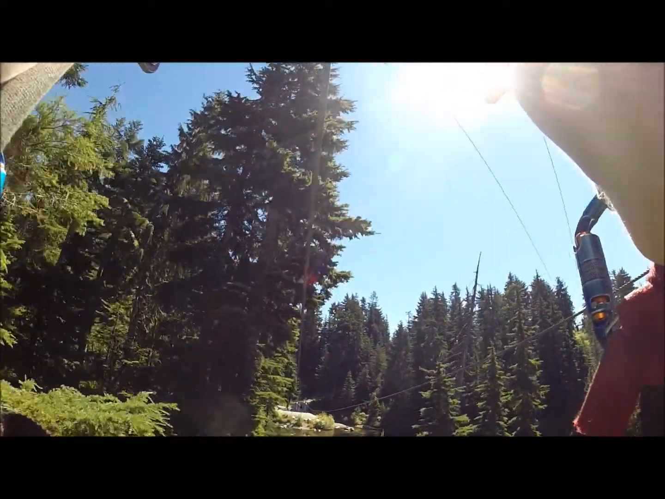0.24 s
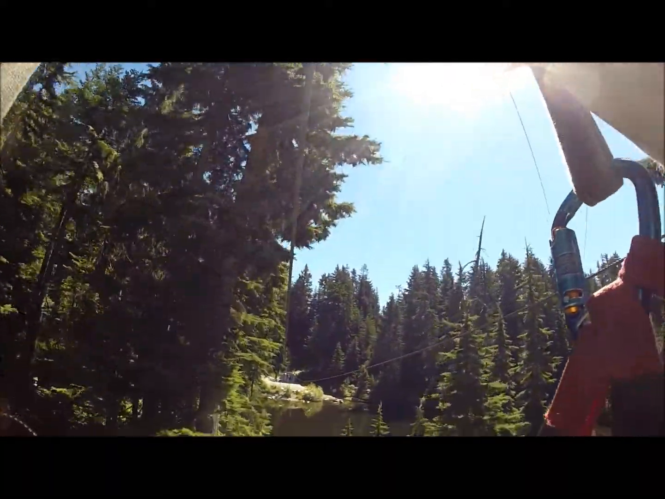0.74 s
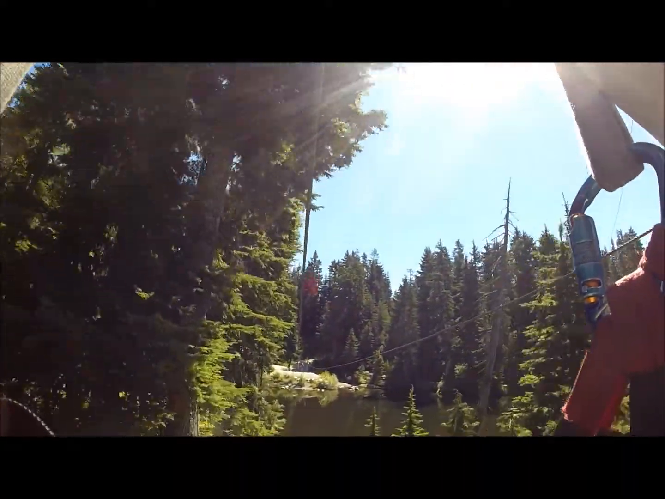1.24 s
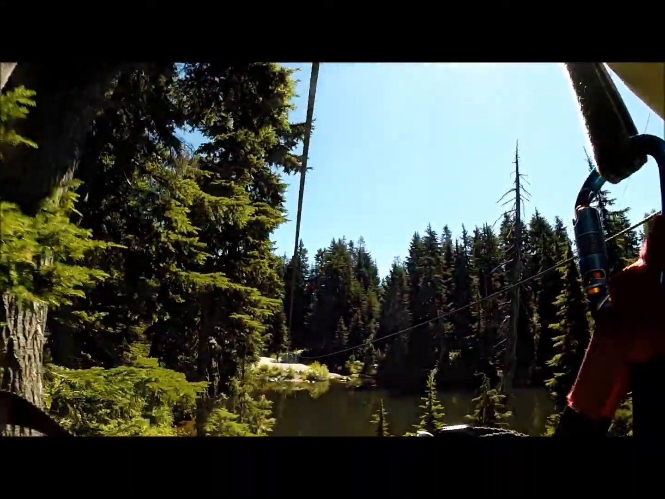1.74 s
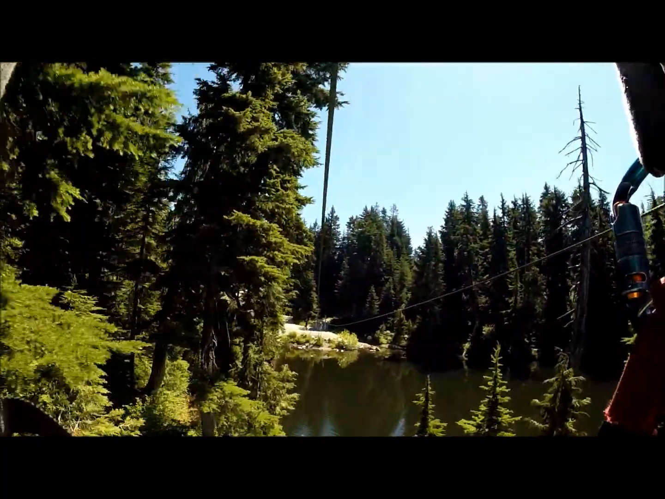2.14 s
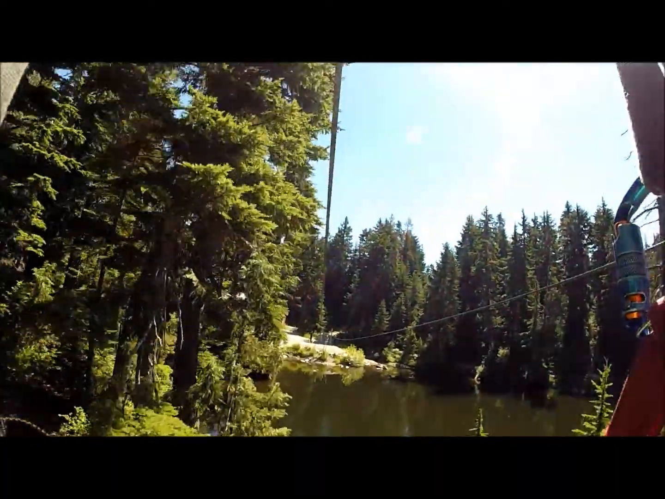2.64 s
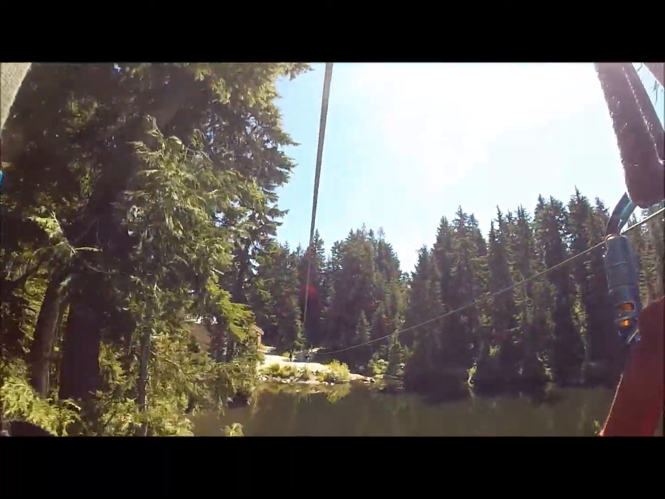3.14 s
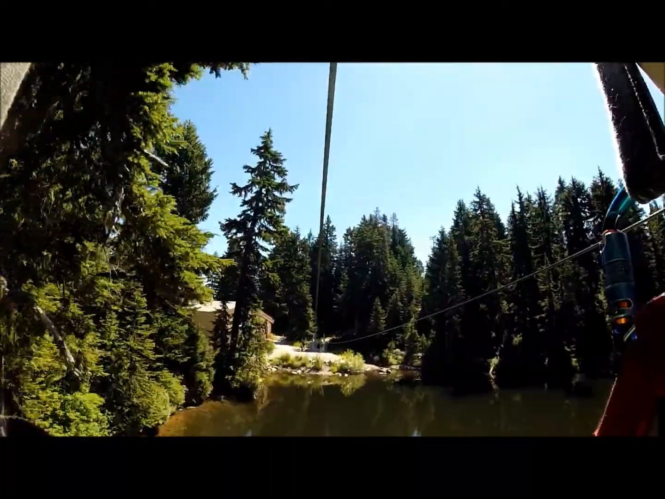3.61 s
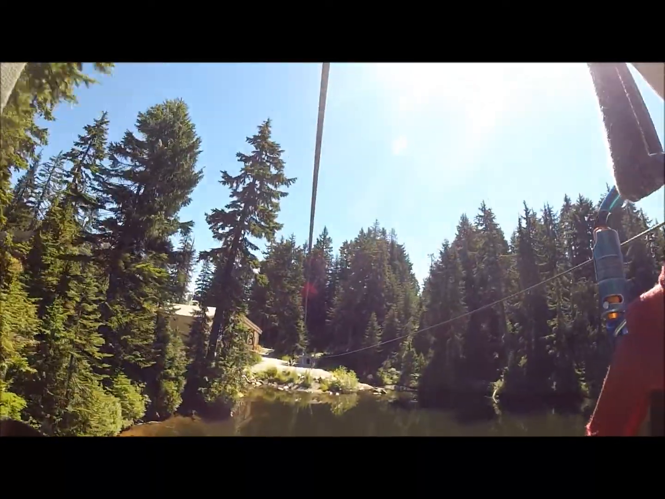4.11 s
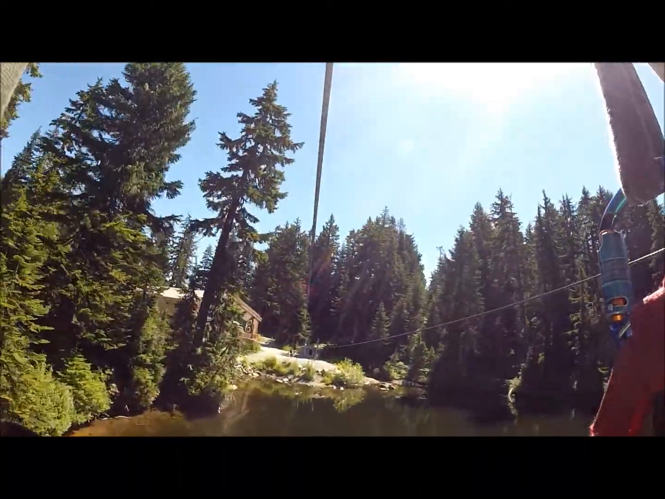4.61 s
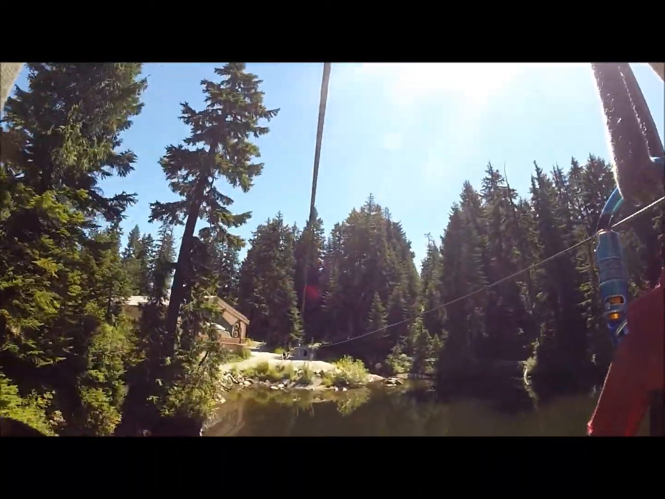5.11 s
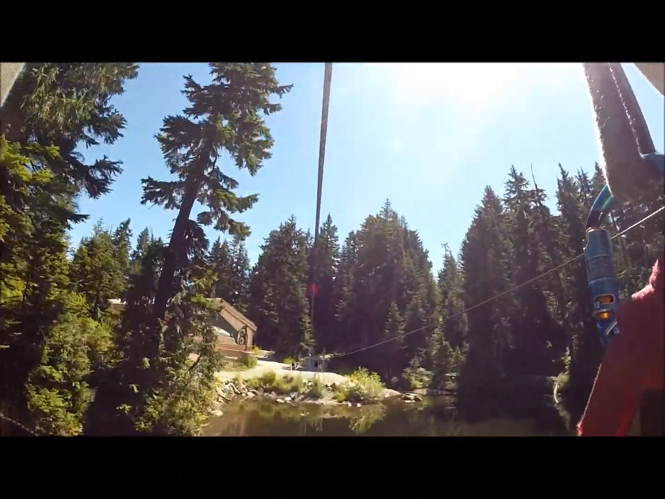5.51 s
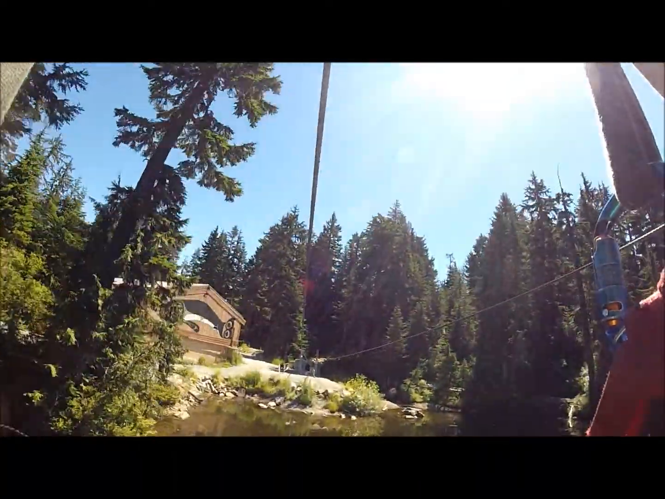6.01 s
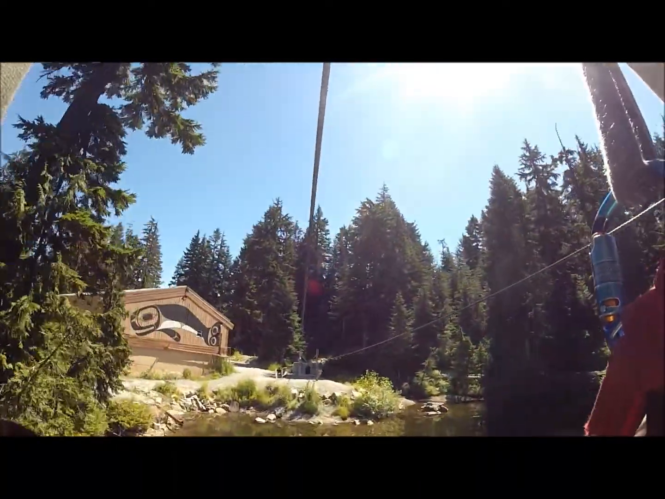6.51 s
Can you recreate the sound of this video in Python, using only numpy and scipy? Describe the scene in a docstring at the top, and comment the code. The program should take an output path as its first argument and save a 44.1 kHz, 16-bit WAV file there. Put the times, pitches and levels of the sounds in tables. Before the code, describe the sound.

A zipline trolley rolls along a steel cable, heard close from the rider's position, with low wind buffeting the microphone throughout and a very faint hush of trees behind. The wheel's whine starts as a low, juddering hum and climbs steadily in pitch, quickly at first and then more slowly. A thin cable zing appears around 0.7 seconds. From 0.8 seconds straps rub and gear ticks; a quick rattle of knocks at 1.5 seconds leads to one sharp, loud clack at about 1.6 seconds. Everything dips briefly, then recovers. The whine is strongest from 2.6 to 4.6 seconds, joined by a rough drone, a grainy rolling rush, hiss and light metallic sizzle. A faint hollow ring comes and goes between 3 and 5.5 seconds. The whine softens around 5 seconds, then swells again near 6 seconds with a brighter rasp and slightly stronger wind.

```python
"""A zipline trolley gathers speed on a stranded steel cable, heard from a camera carried by the rider.
Its wheel bumps over the strands in a rising whine; the rolling rush, the bearing's hiss and the
flange's sizzle grow with speed, while wind buffets the microphone over a faint hush of trees.
Straps rub, the gear knocks, and one sharp clack makes the camera's limiter duck and slowly recover."""
import sys
import numpy as np
from scipy import signal
from scipy.fft import rfft, irfft, next_fast_len
from scipy.io import wavfile
from scipy.ndimage import uniform_filter1d, minimum_filter1d, map_coordinates

SR = 44100
rng = np.random.default_rng(int(sys.argv[2]) if len(sys.argv) > 2 else 0)


def file_out(sig):
    """Save sig as 16-bit WAV at sys.argv[1]."""
    # one column per channel
    cols = np.atleast_2d(sig).T
    # limit, then scale
    lim = np.clip(cols, -1, 1)
    pcm = np.round(lim * 32767).astype(np.int16)
    wavfile.write(sys.argv[1], SR, pcm)


N = 297756

STRANDS_PER_TURN = 23
# rougher and smoother stretches of the ride: peak t/s, rise/s, fall/s, change of the drone/dB
ROUGH_SPELLS = [(1.75, 0.37, 0.14, -14), (2.62, 0.15, 0.23, 7.5), (4.27, 0.23, 0.43, 7),
                (6.25, 0.49, 0.35, 1.5)]


def amp(db):
    """Decibels to gain."""
    return 10 ** (np.asarray(db) / 20)


def unit(x):
    """Scale to rms 1."""
    return x / np.sqrt(np.mean(np.abs(x) ** 2) + 1e-20)


def along(points, hz):
    """Read a curve of f/Hz, value on a log axis."""
    f, v = np.transpose(points)
    return np.interp(np.log(hz + 1), np.log(f + 1), v)


def envelope(points):
    """Straight lines through t/s, value; one value per sample."""
    times, values = np.transpose(points)
    return np.interp(np.arange(N) / SR, times, values)


def swell(peak_s, rise_s, fall_s):
    """A smooth hump of height 1."""
    t = np.arange(N) / SR - peak_s
    return np.exp(-(t / np.where(t < 0, rise_s, fall_s)) ** 2)


def lifts(events):
    """The dB that a table of swells adds over time."""
    return sum(db * swell(s, rise, fall) for s, rise, fall, db in events)


def with_speed(pitch_hz, full_db, db_per_octave, full_hz):
    """A level in dB that grows with speed and settles once the pitch reaches full_hz."""
    return full_db + db_per_octave * np.minimum(np.log2(pitch_hz / full_hz), 0)


def wobble(rate, step=12):
    """A smooth random curve, rate knots a second."""
    knots = rng.standard_normal(4096)
    grid = np.arange(0, N + step, step)
    return np.interp(np.arange(N), grid, map_coordinates(knots, [grid * rate / SR], mode="wrap"))


def filtered(x, response):
    """Filter x with a gain given as a function of frequency."""
    size = next_fast_len(N + SR // 2)
    return irfft(rfft(x, size) * response(np.fft.rfftfreq(size, 1 / SR)), size)[:N]


def equalised(x, colour):
    """Shape x with an EQ curve of f/Hz, gain/dB."""
    return filtered(x, lambda hz: amp(along(colour, hz)))


def impulse_response(colour, size=1024):
    """The minimum-phase impulse response of an EQ curve."""
    cepstrum = irfft(np.log(amp(along(colour, np.fft.rfftfreq(size, 1 / SR)))))
    cepstrum[1:size // 2] *= 2
    cepstrum[size // 2 + 1:] = 0
    return irfft(np.exp(rfft(cepstrum)))


def rig_noise(colour):
    """Coloured noise of rms 1, shaped by the resonances of the rig."""
    # resonances of the hanging rig and the camera case: f/Hz, width/Hz, lift/dB
    resonances = [(31, 8, 4), (54, 12, 5), (108, 20, 3), (166, 16, -4), (192, 16, 6), (1310, 90, 4),
                  (1465, 140, 7), (1870, 70, 5), (2090, 200, 4), (2700, 120, 3), (3100, 150, -2),
                  (3740, 260, 5), (4230, 120, 3), (4700, 150, 2), (5100, 300, -1), (5530, 240, 6.5),
                  (5880, 240, 7), (6230, 200, -3), (7200, 220, 4), (7530, 320, 7), (8490, 200, 5),
                  (9480, 400, 4), (12120, 300, 8), (13400, 550, 5)]

    def response(hz):
        lift_db = sum(db / (1 + 2 * ((hz - f) / width) ** 2) ** 2 for f, width, db in resonances)
        return amp(along(colour, hz) + lift_db)

    return unit(filtered(rng.standard_normal(N), response))


def fuzzy_tones(phase, tones):
    """Narrow bands of noise that ride on multiples of a phase."""
    return sum(amp(db) * unit(wobble(width) * np.cos(k * phase) + wobble(width) * np.sin(k * phase))
               for k, width, db in tones)


def whine(pitch_hz, phase, flutter_db=1.06, jitter_rad=0.53, judder_flutter_db=2.0, smear_db=-15):
    """Each strand bumps the wheel; the bumps merge into a tone with a rough drone around it."""
    # the whine swells and fades: t/s, level/dB
    levels = [(0, -19.5), (.73, -26), (.88, -44), (1.05, -26.5), (1.27, -16.5), (1.44, -27), (1.95, -31),
              (2.2, -25), (2.36, -29), (2.61, -16), (2.95, -17.5), (3.25, -14.5), (3.72, -12.5),
              (4.03, -18), (4.55, -16.5), (5.03, -36.5), (5.95, -33), (6.13, -23), (6.75, -31)]
    # brief dropouts: t/s, way in/s, way out/s, change/dB
    dips = [(.11, 0.028, 0.035, -21), (.225, 0.026, 0.026, -14), (.43, 0.037, 0.052, -17),
            (1.4, .02, 0.028, -16), (2.74, 0.068, 0.035, -9.5), (3.34, 0.033, 0.073, -5.5)]
    # the slow wheel judders just after the launch: peak t/s, rise/s, fall/s
    judder_span = (0.36, 0.34, 0.52)
    # side tones of the drone: multiple of the pitch, width/Hz, relative level/dB
    drone_tones = [(.77, 20, -4.5), (0.859, 14, -6.5), (0.901, 9, 0), (.97, 7, -15.5), (1.092, 16, -10),
                   (1.001, 97, -3)]
    # rough side tones of the judder: multiple of the pitch, width/Hz, level/dB
    judder_tones = [(0.919, 21.43, -32), (1.56, 34.5, -42.5), (2.43, 35.7, -49.5)]
    level_db = envelope(levels) + lifts(dips)
    judder = swell(*judder_span)
    shaky_phase = phase + jitter_rad * wobble(25)
    tremble_db = flutter_db * wobble(30) + judder_flutter_db * judder * wobble(65)
    tone = amp(level_db + tremble_db) * np.sin(shaky_phase)
    drone_db = with_speed(pitch_hz, full_db=-25.0, db_per_octave=22, full_hz=326) + lifts(ROUGH_SPELLS)
    drone_gain = np.hypot(amp(drone_db), amp(level_db + smear_db))
    drone = drone_gain * unit(fuzzy_tones(shaky_phase, drone_tones))
    harmonics = np.sqrt(2) * (tone + overtones(pitch_hz, phase, judder))
    return harmonics + drone + judder * fuzzy_tones(phase, judder_tones)


def overtones(pitch_hz, phase, judder, judder_db=7, flutter_db=2.2, jitter_rad=0.33, db_per_octave=-7):
    """The whine's overtones weaken as they climb, and flare at resonances and while the wheel judders."""
    # overtones: multiple of the pitch, base level at 500 Hz/dB
    partials = [(2, -54.5), (3, -57.5)]
    # rig resonances that each sweeps through: multiple of the pitch, f/Hz, half width/Hz, lift/dB
    resonances = [(2, 345, 40, 17), (2, 562, 36, 16), (3, 458, 22, 5), (3, 585, 18, 10), (3, 845, 60, 11),
                  (3, 1012, 19, 19)]
    out = np.zeros(N)
    for k, base_db in partials:
        hz = k * pitch_hz
        flare_db = sum(db * np.exp(-((hz - f) / width) ** 2)
                       for multiple, f, width, db in resonances if multiple == k)
        tilt_db = db_per_octave * np.log2(hz / 500)
        gain = amp(base_db + tilt_db + flare_db + judder_db * judder + flutter_db * wobble(30))
        out += gain * np.sin(k * (phase + jitter_rad * wobble(25)))
    return out


def rolling(pitch_hz, phase, bearing_db=-3.0):
    """The same bumps shake a grainy rush, the side plates and a hiss; the bearing's tones ride on top."""
    # spectrum of the rush: f/Hz, relative level/dB
    rush_colour = [(30, -64.5), (200, -22), (450, 3), (600, 6.5), (750, -4.5), (950, -1.5), (1200, 0),
                   (1450, -8.5), (1700, -1), (2200, -3.5), (2450, -8.5), (3000, -13), (4000, -13),
                   (8000, -54.5), (14000, -120)]
    # tones of the bearing: multiple of the pitch, width/Hz, relative level/dB
    bearing_tones = [(5.8, 25, -11), (6.1, 25, -9), (6.55, 14, -8.5), (7.02, 22, -12.5), (7.18, 14, -8.5),
                     (7.57, 16, -8.5)]
    # the band in which the wheel radiates them: f/Hz, gain/dB
    bearing_band = [(1550, -18.5), (1780, -8), (1870, 0), (1950, -3.5), (2060, 2), (2190, -1), (2300, -7),
                    (2600, -16.5)]
    bumps = wobble(70)
    roll_db = with_speed(pitch_hz, full_db=-41.0, db_per_octave=12, full_hz=309.0)
    rush = amp(bumps + 1.5 * wobble(8)) * rig_noise(rush_colour)
    plates = side_plates(pitch_hz, bumps)
    hiss = bearing_hiss(pitch_hz, bumps)
    bearing = equalised(fuzzy_tones(phase, bearing_tones), bearing_band)
    return amp(roll_db) * (rush + amp(bearing_db) * bearing) + plates + hiss


def side_plates(pitch_hz, bumps):
    """The trolley's side plates ring on two noisy notes, louder with speed."""
    # the upper note: f/Hz, relative level/dB
    high_colour = [(400, -120), (1000, -54.5), (1270, -7.5), (1460, 4), (1600, -0.5), (1900, -48),
                   (4000, -120)]
    # the lower note, which sounds already at low speed: f/Hz, relative level/dB
    low_colour = [(700, -68.5), (1130, -19.5), (1300, 1.5), (1420, -4), (1750, -28), (2080, -12.5),
                  (2400, -31), (4000, -82)]
    # the upper note rings up: peak t/s, rise/s, fall/s, lift/dB
    swells = [(2.58, .14, 0.073, 4.5), (3.98, 0.088, .06, 2), (4.76, 0.067, .15, 8), (5.95, 0.092, 0.19, 4),
              (6.67, 0.013, 0.02, 9)]
    high_db = with_speed(pitch_hz, full_db=-43.5, db_per_octave=23.5, full_hz=262.0) + lifts(swells)
    low_db = with_speed(pitch_hz, full_db=-50.0, db_per_octave=40, full_hz=160)
    ring = amp(high_db) * rig_noise(high_colour) + amp(low_db) * rig_noise(low_colour)
    return ring * amp(0.55 * bumps + 1.7 * wobble(35))


def bearing_hiss(pitch_hz, bumps):
    """The bearing gives off a fine-grained hiss that grows with speed."""
    # spectrum of the hiss: f/Hz, relative level/dB
    colour = [(300, -61.5), (1500, -10), (3000, -1), (4200, -4.5), (5000, -6.5), (6500, -5), (7800, -9),
              (8200, -12.5), (9000, -16.5), (9700, -12.5), (10400, -11), (10900, -23.5), (14400, -20.5),
              (15100, -32)]
    level_db = with_speed(pitch_hz, full_db=-52.5, db_per_octave=11, full_hz=269)
    return amp(level_db + 0.25 * bumps + 2.8 * wobble(300)) * rig_noise(colour)


def wind(pitch_hz, buffet_db=2.0, strength_share=0.6, rough_share=0.63):
    """Eddies thud on the microphone and buffet the rig; thuds gain with speed and on rough stretches."""
    # air on the microphone: t/s, strength/dB
    strength = [(0, -27), (.7, -25), (.95, -26.5), (1.5, -29), (2.45, -30), (2.95, -22), (3.8, -23.5),
                (4.3, -23.5), (5.2, -26), (5.6, -23), (6.5, -21.5), (6.75, -21)]
    # single gusts and a lull: peak t/s, rise/s, fall/s, change/dB
    gusts = [(.757, 0.012, 0.0064, 6.5), (2.13, 0.09, 0.22, -2), (4.61, 0.05, 0.036, 3.5)]
    # sub-bass of the thuds: f/Hz, relative level/dB
    thud_colour = [(3, -58), (12, -23), (24, 13.5), (32, 20.5), (56, 23.5), (72, 11), (130, -58),
                   (600, -120)]
    # low body of the buffeting: f/Hz, relative level/dB
    buffet_colour = [(10, -60.5), (35, -2), (65, -6), (90, 2), (125, 0), (170, -5.5), (240, -4),
                     (340, -7.5), (420, -15), (500, -24.5), (800, -33.5), (2000, -68.5), (6000, -120)]
    strength_db = envelope(strength) + lifts(gusts)
    thud_db = with_speed(pitch_hz, full_db=-28.0, db_per_octave=4.0, full_hz=332)
    thud_db += strength_share * (strength_db - strength_db.mean()) + rough_share * lifts(ROUGH_SPELLS)
    thud = amp(thud_db + 0.78 * wobble(13)) * rig_noise(thud_colour)
    buffet = amp(strength_db + buffet_db + 0.91 * wobble(14)) * rig_noise(buffet_colour)
    return thud + buffet


def forest(level_db=-60.0):
    """A faint, even hush of air in the trees."""
    # spectrum of the hush: f/Hz, relative level/dB
    colour = [(300, 6), (1300, 3.5), (2800, -10.5), (5000, -22.5), (9000, -15), (15000, -21.5)]
    return amp(level_db) * unit(equalised(rng.standard_normal(N), colour))


def flange(pitch_hz, phase, turn_db=2, chatter_db=2):
    """The wheel's flange grazes the cable with a sizzle that pulses once a turn and flares in scrapes."""
    # scrapes on the cable: peak t/s, rise/s, fall/s, level/dB
    scrapes = [(.38, 0.024, 0.14, -59), (.7, 0.15, 0.19, -50), (1.0, 0.13, 0.22, -57),
               (2.48, 0.024, 0.059, -49.5), (2.8, 0.19, 0.13, -50), (3.401, .25, 0.39, -58),
               (4.43, .08, 0.095, -52.5), (6.13, 0.098, 0.094, -52), (6.6, 0.18, 0.12, -52.5)]
    # spectrum of the sizzle: f/Hz, relative level/dB
    colour = [(900, -40.5), (1300, 1), (1700, -12), (3000, -19), (3700, 1.5), (4300, -1.5), (5000, -10),
              (6400, -11.5), (7600, -1), (8300, -13), (9000, -14), (9700, -6), (10400, -11), (11000, -24.5),
              (14200, -15), (15100, -21.5)]
    graze = amp(with_speed(pitch_hz, full_db=-64.5, db_per_octave=18, full_hz=255))
    flares = sum(amp(db) * swell(s, rise, fall) for s, rise, fall, db in scrapes)
    pulsing = amp(turn_db * np.sin(phase / STRANDS_PER_TURN) + chatter_db * wobble(45))
    return np.hypot(graze, flares) * unit(pulsing * rig_noise(colour))


def cable_zing(peak_s=0.69, rise_s=0.11, fall_s=0.68, level_db=-53):
    """The cable sings thinly soon after the launch."""
    # spectrum of the zing: f/Hz, relative level/dB
    colour = [(1500, -52), (2080, -12), (2500, -14), (3400, -1.5), (4200, -1), (4900, -11.5), (5400, -0.5),
              (6300, 0.5), (6900, -8.5), (9000, -40.5)]
    return amp(level_db + 1.4 * wobble(30)) * swell(peak_s, rise_s, fall_s) * rig_noise(colour)


def wheel_ring(phase, turn_db=4, shared_db=2.0, own_db=2):
    """The cable bows the steel wheel once a turn; each mode swells and fades in its own way."""
    # modes of the wheel: f/Hz, width/Hz, relative level/dB
    modes = [(3750, 180, 0), (5550, 170, -9), (5890, 150, -7), (7235, 150, -10), (7520, 150, -4.5)]
    # how strongly the wheel rings: t/s, level/dB
    levels = [(0, -85), (.5, -74), (.72, -59), (1.1, -64.5), (2.36, -65), (2.47, -57.5), (2.85, -59),
              (3.1, -61), (4.45, -59.5), (5.2, -60.5), (6.75, -64)]
    level_db = envelope(levels) + turn_db * np.sin(phase / STRANDS_PER_TURN) + shared_db * wobble(10)
    one_hz_phase = 2 * np.pi * np.arange(N) / SR
    ring = sum(amp(own_db * wobble(9)) * fuzzy_tones(one_hz_phase, [mode]) for mode in modes)
    return amp(level_db) * ring


def straps(fade_s=0.031, grain_db=3):
    """Webbing drags over the gear in short grainy strokes."""
    # strokes of the webbing: start/s, end/s, level/dB
    rubs = [(0.807, 0.95, -46), (0.968, 1.048, -50), (1.376, 1.422, -38.5), (1.416, 1.515, -44.5),
            (1.526, 1.594, -35.5), (1.97, 2.08, -45), (2.295, 2.364, -44)]
    # spectrum of the rubbing: f/Hz, relative level/dB
    colour = [(40, -52), (300, -19), (1000, -3), (1800, -6), (2300, -5.5), (2850, -3.5), (3300, -16),
              (6000, -25), (12000, -39), (16000, -78.5)]
    t = np.arange(N) / SR
    strokes = sum(amp(db) * np.clip(np.minimum(t - start, end - t) / fade_s + .5, 0, 1)
                  for start, end, db in rubs)
    grain = amp(grain_db * wobble(180))
    return strokes * unit(grain * equalised(rng.standard_normal(N), colour))


def knocks(rattle=0.33):
    """Each knock is a tap and a quickly damped rattle; soft contacts lose treble, light parts bass."""
    # small knocks of the gear: t/s, peak/dB, t60/s, low cut/Hz, high cut/Hz
    hits = [(0.9835, -30, 0.012, 1900, 3300), (1.011, -28, 0.014, 1900, 3300),
            (1.048, -25, 0.0057, 1900, 13000), (1.383, -24, 0.025, 600, 3560),
            (1.528, -5.5, 0.012, 280, 3770), (1.5305, -15.5, 0.0094, 250, 6000),
            (1.5555, -15, 0.008, 300, 5200), (1.5601, -15, 0.0093, 294, 6000),
            (1.5641, -13, 0.0095, 300, 7000), (1.5758, -16.5, 0.009, 300, 5500),
            (1.5806, -16, 0.011, 300, 5200), (2.8535, -18, 0.0099, 1600, 2000),
            (2.857, -24, 0.032, 650, 785), (3.31, -29, .005, 1400, 3500)]
    # body of the gear: f/Hz, relative level/dB
    colour = [(100, -2), (350, 6), (700, -0.5), (1000, -9), (1450, 4.5), (1800, -1), (2250, -0.5),
              (2700, -5.5), (3200, -14.5), (5000, -15.5), (8000, -21), (15000, -35)]
    out, t = np.zeros(N + SR), np.arange(SR // 20) / SR
    body = impulse_response(colour)
    for s, db, t60, low_cut_hz, high_cut_hz in hits:
        force = (t == 0) + rattle * rng.standard_normal(len(t)) * amp(-60 * t / t60)
        force = signal.sosfilt(signal.butter(4, high_cut_hz, fs=SR, output="sos"), force)
        force = signal.sosfilt(signal.butter(2, low_cut_hz, "high", fs=SR, output="sos"), force)
        knock = signal.fftconvolve(force, body)
        out[round(s * SR):][:len(knock)] += amp(db) * knock / np.abs(knock).max()
    return out[:N]


def clack(crack_db=-33, crack_t60=0.005, attack_s=0.00037):
    """A hard blow and its rebound ring the camera case, each with a crack of noise."""
    # the blow and the rebound: t/s, gain/dB
    blows = [(1.6343, 19), (1.638, -7)]
    # modes of the case: f/Hz, relative level/dB, t60/s
    modes = [(170, -15, .028), (450, -14, .022), (1150, -14, .012), (1400, -5, .014), (1980, -3, .009),
             (2240, -1, .008), (2520, -2, .009), (3000, -10, .009), (3650, -13, .011), (4150, -14, .011),
             (4750, -14, .011), (5450, -19, .01)]
    out, t = np.zeros(N + SR), np.arange(SR // 10) / SR
    ring = sum(amp(db - 60 * t / t60) * np.sin(2 * np.pi * hz * t) for hz, db, t60 in modes)
    ring *= 1 - np.exp(-t / attack_s)
    for s, db in blows:
        crack = amp(crack_db - 60 * t / crack_t60) * rng.standard_normal(len(t))
        out[round(s * SR):][:len(t)] += amp(db) * (ring + crack)
    return out[:N]


def hollow_ring():
    """Now and then the rolling takes on a hollow ring."""
    # hollow swells: peak t/s, rise/s, fall/s, level/dB
    swells = [(3.35, .15, 0.13, -51.5), (3.95, .08, 0.11, -40.5), (4.38, .1, 0.096, -46),
              (4.85, 0.11, 0.12, -47), (5.24, 0.2, 0.23, -42.5)]
    # their midrange spectrum: f/Hz, relative level/dB
    colour = [(350, -40), (500, -6.5), (560, 6.5), (620, -6.5), (700, -10.5), (800, -1.5), (900, -2.5),
              (1020, -22), (1600, -60)]
    return sum(amp(db) * swell(s, rise, fall) for s, rise, fall, db in swells) * rig_noise(colour)


def cable_rasp(grain_db=1.5):
    """On a rougher stretch of cable late in the ride the rolling turns brighter."""
    # envelope of the rasp: t/s, level/dB
    levels = [(5.75, -72), (5.88, -49), (6.15, -47.5), (6.4, -46), (6.75, -52)]
    # spectrum of the rasp: f/Hz, relative level/dB
    colour = [(850, -24), (1020, 8), (1110, 6), (1250, -12), (1800, -7.5), (2080, 4), (2500, -2),
              (3300, -5), (4200, -8), (5000, -16), (7500, -24), (11000, -38), (15000, -54.5)]
    return amp(envelope(levels) + grain_db * wobble(60)) * rig_noise(colour)


def scene():
    """The mono mix: the trolley's speed sets the pitch of its whine and lifts its running noises."""
    # speed, as the rate at which the wheel crosses the cable's strands: t/s, f/Hz
    strand_rate = [(0, 120), (.52, 153), (.8, 166), (1.3, 194), (1.95, 225), (2.5, 248), (3, 263.5),
                   (3.5, 281), (4, 295.5), (4.5, 308), (5, 319), (5.6, 327.5), (6.2, 336), (6.75, 343)]
    pitch_hz = envelope(strand_rate)
    phase = 2 * np.pi * np.cumsum(pitch_hz) / SR
    trolley = whine(pitch_hz, phase) + rolling(pitch_hz, phase) + flange(pitch_hz, phase)
    ride = trolley + wheel_ring(phase) + cable_rasp() + hollow_ring() + cable_zing()
    return (ride + wind(pitch_hz) + forest() + straps() + knocks() + clack())[None]


def limiter(x, threshold=1.15, release_db_per_s=21, hold_samples=1100):
    """The gain ducks just ahead of a loud peak, which still clips a little, and slowly climbs back."""
    over_db = 20 * np.log10(np.maximum(np.abs(x) / threshold, 1))
    climb_db = release_db_per_s * np.arange(N) / SR
    gain = amp(climb_db - np.maximum.accumulate(over_db + climb_db))
    smooth_gain = uniform_filter1d(minimum_filter1d(gain, hold_samples), hold_samples // 2)
    return np.clip(x * smooth_gain, -1, 1)


def record(dry):
    """The camera limits the peaks and rolls off steeply at its band limit."""
    top_hz = 14900
    return filtered(limiter(dry[0]), lambda hz: 1 / np.sqrt(1 + (hz / top_hz) ** 70))[None]


dry = scene()
out = record(dry)
file_out(out)
```